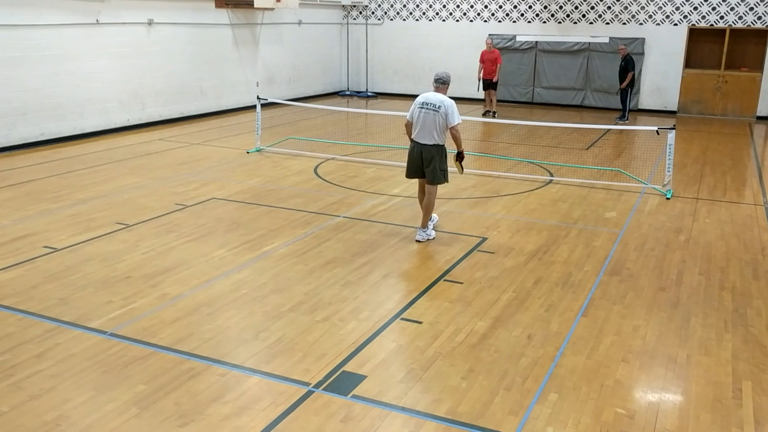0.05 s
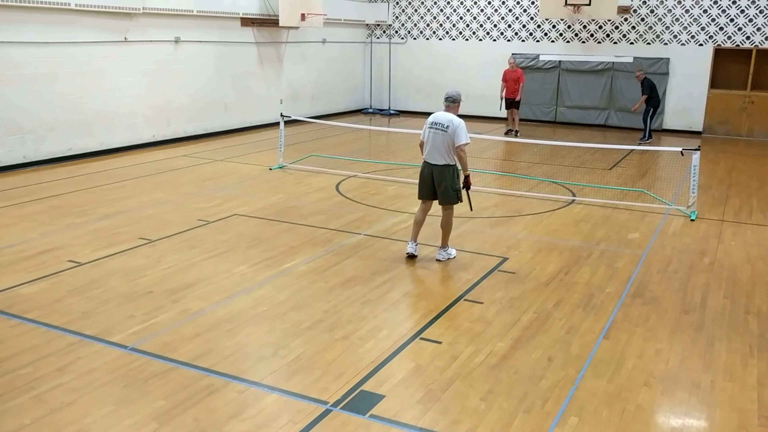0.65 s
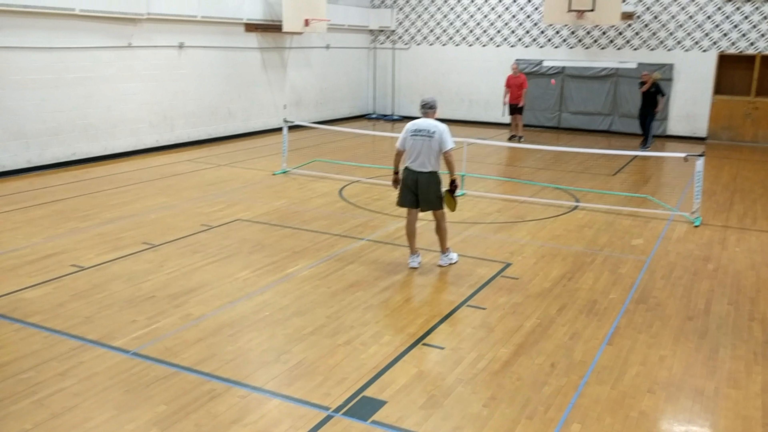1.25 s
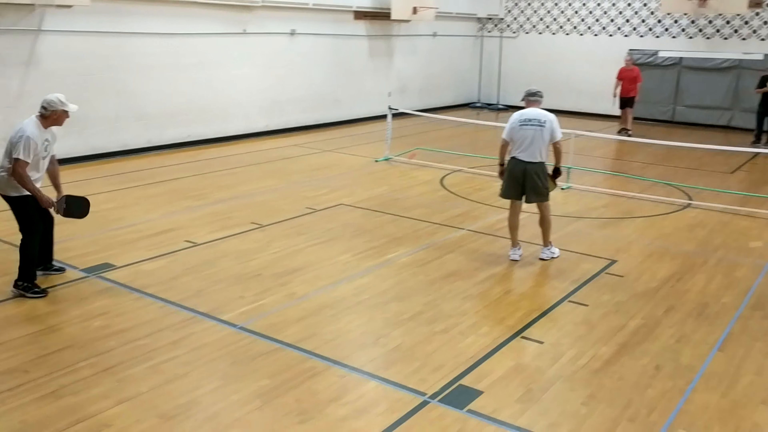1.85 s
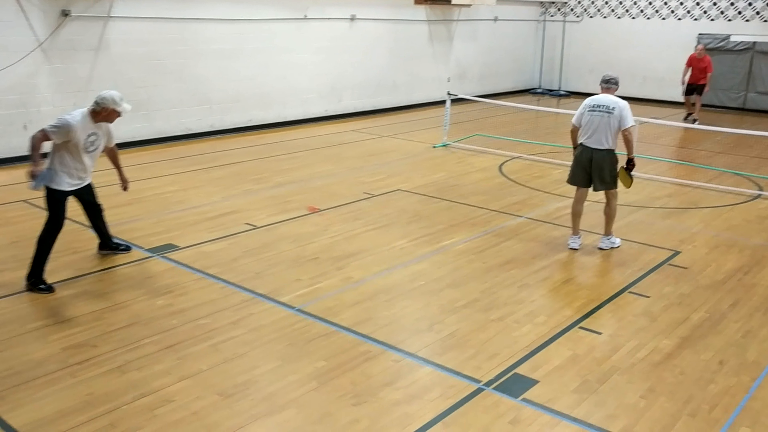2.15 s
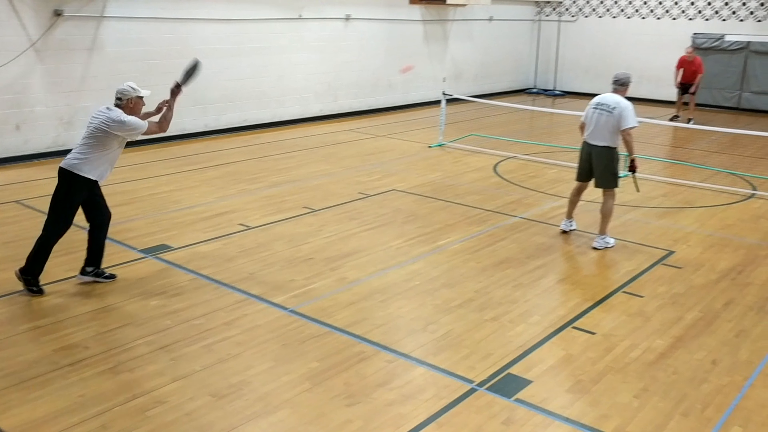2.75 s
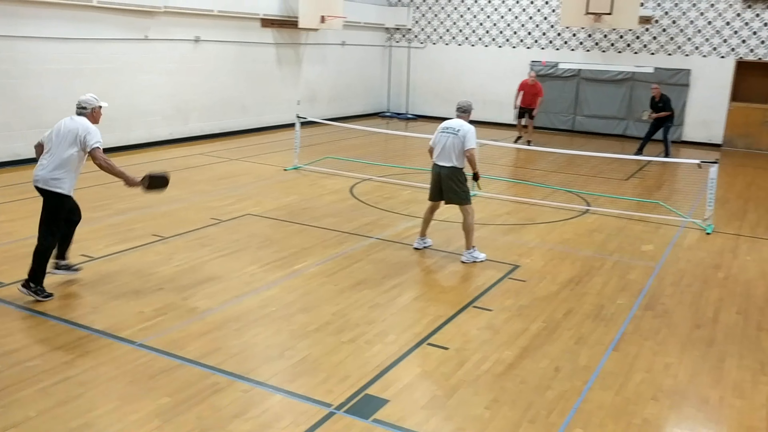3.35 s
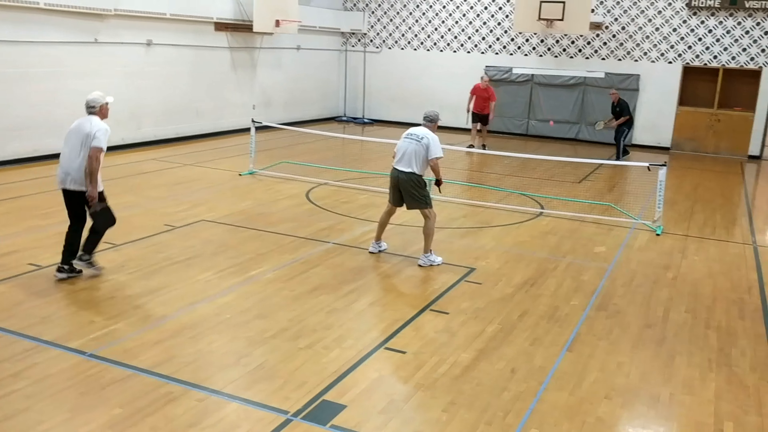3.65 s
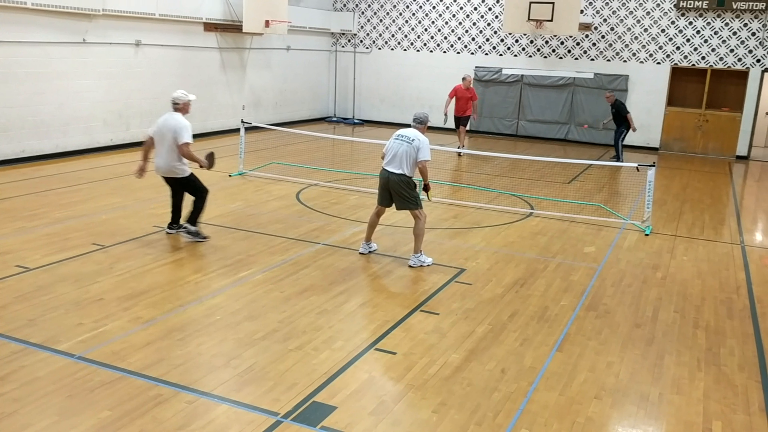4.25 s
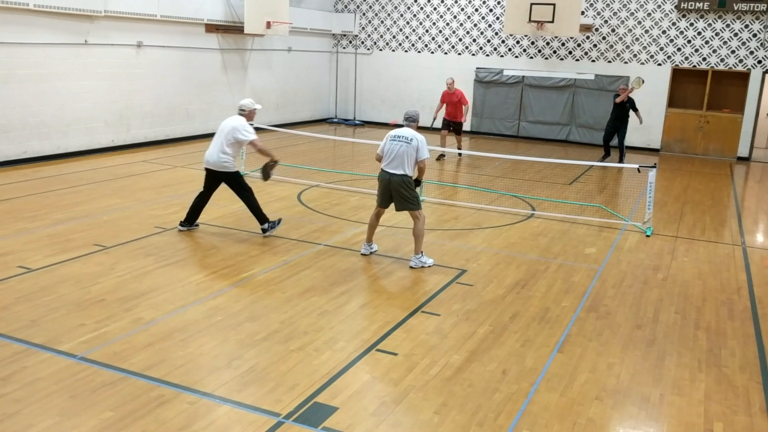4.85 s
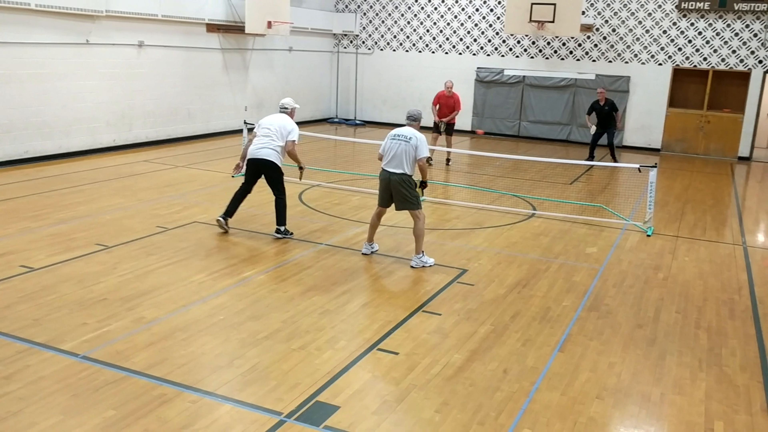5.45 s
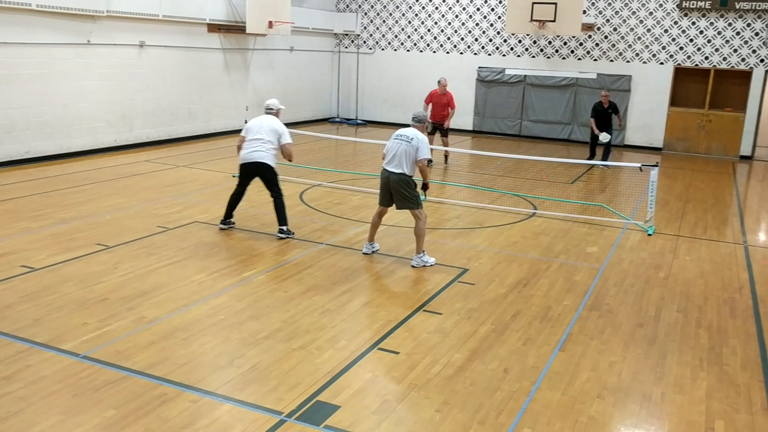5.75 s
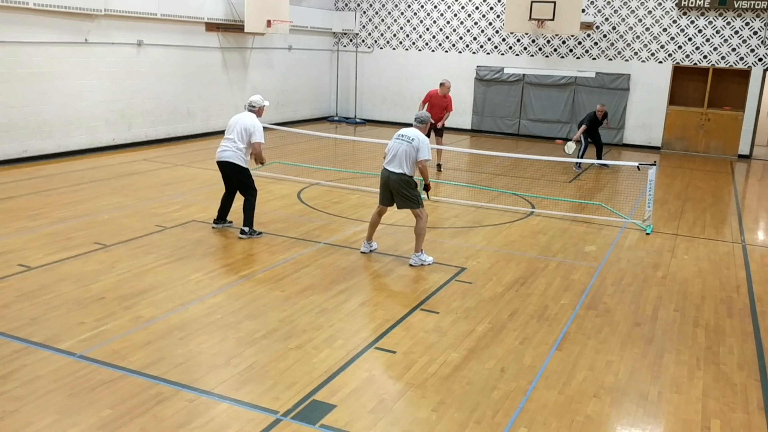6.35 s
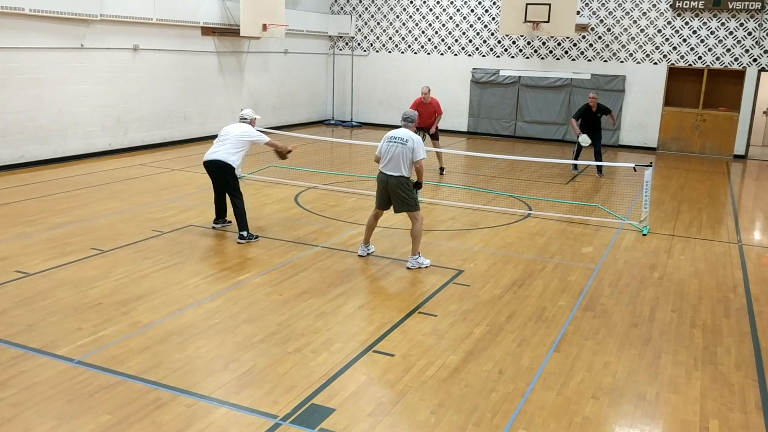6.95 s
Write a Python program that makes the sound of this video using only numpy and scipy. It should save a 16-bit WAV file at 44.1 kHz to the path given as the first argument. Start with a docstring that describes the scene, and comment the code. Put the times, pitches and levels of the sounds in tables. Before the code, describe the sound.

Lights and fans hum and air ducts rush softly in a big gym. A paddle pops a plastic ball, the ball bounces on wood, and another pop answers. Low footsteps and a bounce lead to two closer hits, then comes one more bounce and a last hit among shoe thuds. Heard from a corner of the court, each blow leaves a long echo.

```python
"""A large, echoing gym, heard from the near corner of the court during a pickleball rally.
Paddles pop a hollow plastic ball, it bounces on the springy wooden floor, and shoes thud and scuff.
Every blow rings on in the hall, over the hum of lights and fans and the rush of the air ducts."""
import sys
import numpy as np
from scipy import signal
from scipy.fft import rfft, irfft
from scipy.io import wavfile
from scipy.ndimage import uniform_filter1d

SR = 44100
rng = np.random.default_rng(int(sys.argv[2]) if len(sys.argv) > 2 else 0)


def unload_wav(signal):
    """Save mono or channel-first audio to the path in sys.argv[1] as 16-bit WAV at rate SR, clipped to [-1, 1]."""
    wavfile.write(
        sys.argv[1],
        SR,
        np.round(np.clip(np.atleast_2d(signal).T, -1, 1) * 32767).astype(np.int16),
    )


N = 313551


def undb(db):
    """Turn decibels into a number to multiply by."""
    return 10 ** (np.asarray(db) / 20)


def freqs(size):
    """The frequencies in the spectrum of this many samples, never below 1 Hz."""
    return np.maximum(np.arange(size // 2 + 1) * SR / size, 1)


def read(table, hz):
    """Read between a table's (Hz, value) points, with octaves evenly spaced."""
    points, values = np.transpose(table)
    return np.interp(np.log(hz), np.log(points), values)


def peaks(hz, centres, widths, heights):
    """Bumps in a spectrum, in dB, where something rings."""
    offsets = (hz - centres[:, None]) / widths[:, None]
    return np.array(heights) @ (1 / (1 + offsets ** 2))


def impulse(db):
    """The shortest, most sudden pulse that has this spectrum."""
    cepstrum = irfft(np.log(undb(db)))
    half = len(cepstrum) // 2
    cepstrum[1:half] *= 2
    cepstrum[half + 1:] = 0
    return irfft(np.exp(rfft(cepstrum)))[:half]


def wander(rate_hz):
    """A smooth random drift with a spread of 1."""
    size = int(SR / rate_hz)
    held = np.repeat(rng.standard_normal(N // size + 1), size)
    smooth = uniform_filter1d(uniform_filter1d(held, size), size)[:N]
    return smooth / smooth.std()


def add(out, start_s, sound):
    """Mix a sound in at its start time."""
    start = int(start_s * SR)
    out[start:start + len(sound)] += sound[:N - start]


def ventilation():
    """Air rushes steadily through the ducts, with a few faint, thin whines."""
    # The rush. Each row: frequency in Hz, level in dB per Hz.
    rush = [(25, -84), (50, -74.5), (100, -68), (170, -75), (400, -74.5), (950, -74.5), (1500, -77.5),
            (2200, -81), (3500, -90), (5800, -93), (7800, -100), (9800, -101), (12500, -104), (16000, -109)]
    # Each row: pitch in Hz, half width in Hz, height in dB.
    whines = [(9030, 70, 7), (9760, 210, 4.5), (13400, 70, 7)]
    hz = freqs(N)
    air_db = read(rush, hz) + peaks(hz, *np.transpose(whines))
    air = irfft(rfft(rng.standard_normal(N)) * undb(air_db), N) * np.sqrt(SR / 2)
    return air * undb(.25 * wander(8))


def hum():
    """Lights and fan motors give off tones that waver."""
    # Each row: pitch in Hz, average level in dB, wavering as a share of the tone's strength.
    tones = [(95, -46, 0.77), (120.2, -38, 0.017), (238.6, -62.5, 0.32), (598, -62, 0.54), (685, -69, .6),
             (772, -57, 0.3)]
    out, t = np.zeros(N), np.arange(N) / SR
    for hz, db, waver in tones:
        swing = 1 + waver * (wander(7) + 1j * wander(7))  # moves both strength and phase
        swing /= np.sqrt(1 + 2 * waver ** 2)
        out += undb(db) * np.sqrt(2) * np.real(swing * np.exp(2j * np.pi * hz * t))
    return out


def hall(ceiling_db, grain_db=6, merge_s=0.056, build_s=0.14, linger_db=-25, linger_s=2.8):
    """The gym's answer to a click: separate echoes merge into a wash whose treble dies first."""
    # Each row: frequency in Hz, seconds to fade by 60 dB.
    fade_times = [(60, 4.2), (250, 1.58), (1000, 1.92), (2200, 2.24), (5000, 1.64), (8000, 1.2),
                  (11000, 0.76), (16000, 0.37)]
    size = 2 ** 17
    t = np.arange(size) / SR
    spread = np.log(undb(grain_db)) * np.exp(-t / merge_s)
    strengths = np.repeat(rng.standard_normal(size // 32), 32)
    echoes = rfft(rng.standard_normal(size) * np.exp(spread * strengths - spread ** 2))
    # a faint part runs to and fro between the bare walls and outlasts the rest
    linger = undb(linger_db - 60 * t / linger_s)
    centres = np.geomspace(60, 16000, 16)
    wash = 0
    for hz, one_band in zip(centres, np.eye(len(centres))):
        band = irfft(echoes * np.interp(np.log(freqs(size)), np.log(centres), one_band))
        fade = undb(-60 * t / read(fade_times, hz))
        wash = wash + band * np.hypot(fade, linger)
    wash *= 1 - 0.17 * np.exp(-t / build_s)
    # the high ceiling's share lifts or lowers the wash around 48 ms
    wash *= undb(ceiling_db * np.exp(-((t - 0.048) / 0.066) ** 2))
    return wash / np.sqrt(SR * .15)


def thuds_and_scuffs(thud_hz=63, scuff_slope_db=6, room_db=-3):
    """Low thuds in the boards, from heels and once with the ball's bounce; soles rub the varnish."""
    # Each row: start in seconds, level in dB, pitch in Hz.
    thuds = [(3.301, 17, 63), (3.451, 17.5, 63), (3.65, 15.5, 63), (4.01, 13, 63), (4.232, 16, 60.1),
             (5.961, 15, 82), (6.28, 13, 73), (6.361, 21, 76.2), (7.03, 17, 90)]
    # A thud pitched at thud_hz. Each row: frequency in Hz, level in dB.
    thud_tone = [(25, -36), (42, -12), (54, 6), (75, 2), (120, -12), (250, -10), (1000, -35), (8000, -65)]
    # Each row: start in seconds, length in seconds, level in dB, rough pitch in Hz.
    scuffs = [(4.293, 0.19, -14.5, 8000), (6.349, 0.019, 3.5, 1440)]
    out, hz = np.zeros(N), freqs(2 ** 13)
    for start_s, db, pitch_hz in thuds:
        add(out, start_s, impulse(db + read(thud_tone, hz * thud_hz / pitch_hz)))
    t = np.arange(2 ** 14) / SR
    for start_s, length_s, db, pitch_hz in scuffs:
        rub = rng.standard_normal(len(t)) * np.sin(np.pi * np.minimum(t / length_s, 1))
        colour = impulse(db - scuff_slope_db * np.log2(0.25 + hz / pitch_hz) ** 2)
        add(out, start_s, signal.fftconvolve(rub / np.linalg.norm(rub), colour))
    return out + undb(room_db) * signal.fftconvolve(out, hall(ceiling_db=3))[:N]


def ball_contact(decay_s, push_hz, rattle_db, snap_hz, snap_db):
    """The ball meets a surface: a low push, a high snap and a brief rattle of its shell in between."""
    # The rattle's tone. Each row: frequency in Hz, level in dB.
    rattle_tone = [(500, -12), (1100, -2.5), (1600, 2.5), (2500, 8.5), (4200, 1.5), (7000, -8.5),
                   (15000, -38)]
    t = np.arange(2 ** 11) / SR
    tap = 1. * (t == 0)
    push = signal.sosfilt(signal.butter(2, push_hz, fs=SR, output="sos"), tap)
    burst = rng.standard_normal(len(t)) * np.exp(-(t / .0006) ** 2)
    treble_only = signal.butter(2, snap_hz, "high", fs=SR, output="sos")
    snap = signal.sosfilt(treble_only, burst / np.linalg.norm(burst))
    shake = rng.standard_normal(len(t)) * np.exp(-(t / decay_s) ** 2)
    colour = impulse(rattle_db + read(rattle_tone, freqs(len(t))))
    rattle = signal.fftconvolve(shake / np.linalg.norm(shake), colour)[:len(t)]
    return push + undb(snap_db) * snap + rattle


def in_gym(pulse, contact, faintness, wall_s, near_db, wall_db, ceiling_db):
    """A blow arrives straight, then off a nearby surface, twice off the walls, and from the whole hall."""
    direct = contact * undb(7.5) / faintness
    response = hall(ceiling_db)
    add(response, 0, direct)
    add(response, .0031, undb(near_db) * direct)  # off a surface beside the microphone
    add(response, wall_s, undb(wall_db) * contact)
    add(response, 2 * wall_s, undb(wall_db - 0.5) * contact)
    return signal.fftconvolve(pulse, response)


def bounces():
    """The ball ticks on the floor and sets the boards booming."""
    # Each row: start in seconds, level in dB, treble tilt in dB per octave, how faint the direct
    # sound is against the hall's echo (larger is fainter), wall echo delay in seconds.
    landings = [ (2.1893, 8.5, -0.4, 7.3, 0.046), (4.009, 7.5, -0.35, 12, 0.024),
                (5.942, 6, -1.8, 14, .028)]
    # The boom and tick. Each row: frequency in Hz, level in dB.
    boards = [(25, -21), (50, 2), (100, 19), (200, 13.5), (350, 11), (600, -1), (1200, 0), (3000, -10),
              (5500, -6), (10000, -11), (16000, -13)]
    out, hz = np.zeros(N), freqs(2 ** 13)
    for start_s, db, tilt_db, faintness, wall_s in landings:
        tock = impulse(db + read(boards, hz) + tilt_db * np.log2(1 + hz / 1000))
        contact = ball_contact(decay_s=0.00079, push_hz=2800, rattle_db=-1.5, snap_hz=5000, snap_db=1)
        heard = in_gym(tock, contact, faintness, wall_s, near_db=-13, wall_db=-17.5, ceiling_db=0.5)
        add(out, start_s, heard)
    return out


def paddles(overtone_hz=1513, release_db=-18):
    """Each stroke knocks, and the paddle's face rings like a drum; where the ball hits shapes the tone."""
    # Each row: start in seconds, level in dB, treble tilt in dB per octave, face pitch in Hz,
    # face ring in dB, overtone ring in dB, hit spot (0 centre, 1 rim), contact time in seconds,
    # how faint the direct pop is against the hall's echo (larger is fainter), wall echo delay in seconds.
    strokes = [ (1.1616, 24, -0.13, 1002, 18.5, -1.5, 0.26, 0.0018, 13, 0.0073),
               (2.6819, 23.5, 0.04, 966, 24, 11, 0.45, 0.001904, 8.1, .0242),
               (4.4845, 23.5, 0.4, 1018, 23, 9, 1, 0.00141, 8.8, 0.022),
               (5.1694, 23, -0.22, 939, 25.5, 5, 0.07, .0028, 5.9, 0.036),
               (6.4306, 24, 0.41, 1016, 11.5, 9.5, 0.73, 0.0014, 9.8, 0.027)]
    # Other rings of paddle and ball; the third is the ball's lowest. Each row: pitch in Hz,
    # half width in Hz, height in dB for a centre hit, dB added at the rim.
    side_rings = [(660, 184, -4.5, 12), (1270, 137, 9, -22.5), (2050, 138, 3.5, 6), (5100, 2000, 6, -3.5)]
    # Each row: frequency in Hz, level in dB.
    bare_knock = [(25, -30), (60, -21), (160, -2), (300, 0), (660, -1.5), (790, -6.5), (1100, -2.5),
                  (2400, -6.5), (3100, -10.5), (6500, -14), (10000, -13), (13000, -15.5), (16000, -18)]
    # Overtones of the ball's shell. Each row: pitch in Hz, half width in Hz, height in dB.
    shell = [(2280, 13, 5), (2720, 36, 3), (3510, 80, 2.5), (3860, 25, 4), (4140, 37, 5.5), (5260, 32, 3),
             (5820, 180, 2.5), (7280, 62, 0), (9500, 39, 0)]
    out, hz = np.zeros(N), freqs(2 ** 13)
    knock = read(bare_knock, hz) + peaks(hz, *np.transpose(shell))
    centres, widths, centre_db, rim_db = np.transpose(side_rings)
    half_widths_hz = np.array([106, 143])  # the face's main ring and its overtone
    for start_s, db, tilt_db, face_hz, face_db, overtone_db, spot, hold_s, faintness, wall_s in strokes:
        face = peaks(hz, np.array([face_hz, overtone_hz]), half_widths_hz, [face_db, overtone_db])
        side = peaks(hz, centres, widths, centre_db + spot * rim_db)
        # a reverse kick as the ball leaves mixes with the blow and ripples the spectrum
        kick = undb(release_db) * np.exp(-2j * np.pi * hz * hold_s)
        ripple = 20 * np.log10(np.abs(1 - kick))
        pop = impulse(db + knock + face + side + ripple + tilt_db * np.log2(1 + hz / 1000))
        contact = ball_contact(decay_s=0.0033, push_hz=940, rattle_db=-2.5, snap_hz=3300, snap_db=-2.5)
        heard = in_gym(pop, contact, faintness, wall_s, near_db=-3.5, wall_db=-17, ceiling_db=-0.4)
        add(out, start_s, heard)
    return out


def scene():
    """The rally and the building around it, in one channel."""
    return (paddles() + bounces() + thuds_and_scuffs() + ventilation() + hum())[None]


def record(dry):
    """The microphone rounds off the loudest peaks, and the highest treble is cut."""
    treble_cut = signal.ellip(10, .1, 80, 15900, fs=SR, output="sos")
    return signal.sosfilt(treble_cut, np.tanh(dry))


dry = scene()
out = record(dry)
unload_wav(out)
```